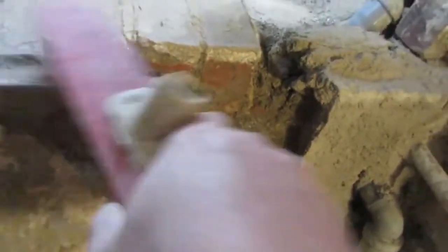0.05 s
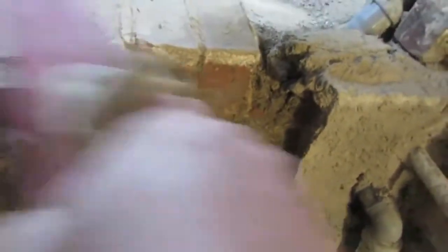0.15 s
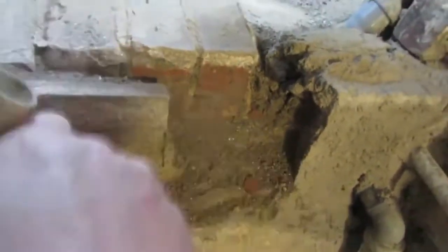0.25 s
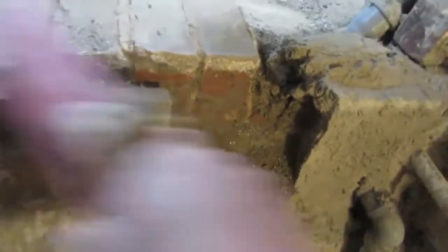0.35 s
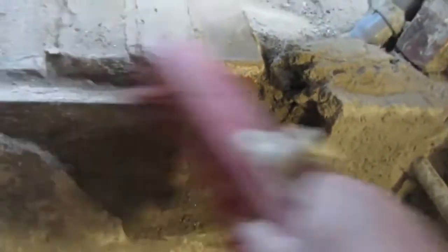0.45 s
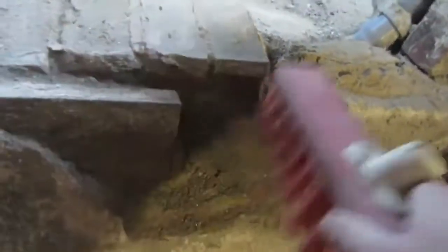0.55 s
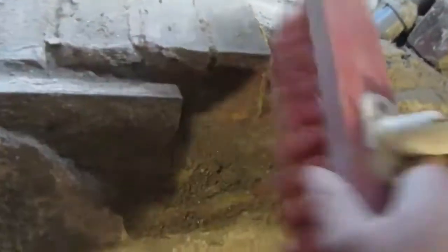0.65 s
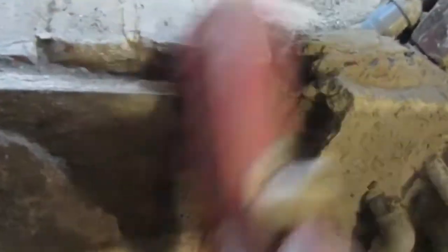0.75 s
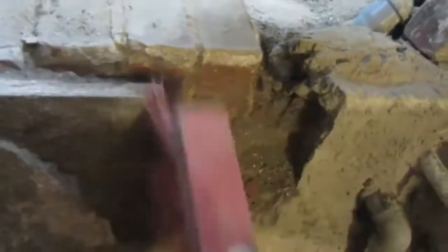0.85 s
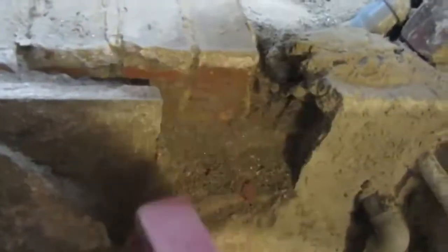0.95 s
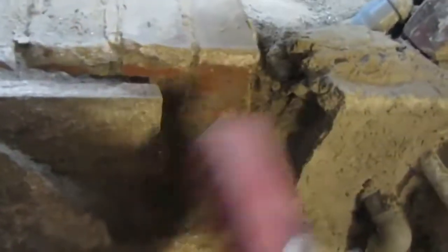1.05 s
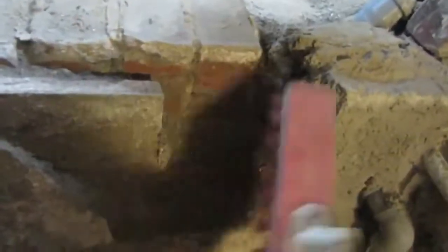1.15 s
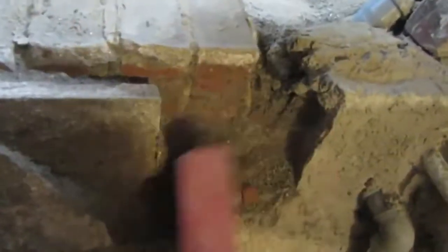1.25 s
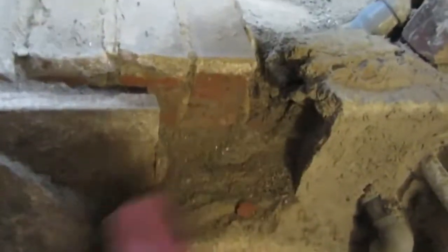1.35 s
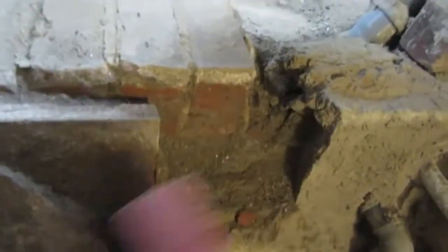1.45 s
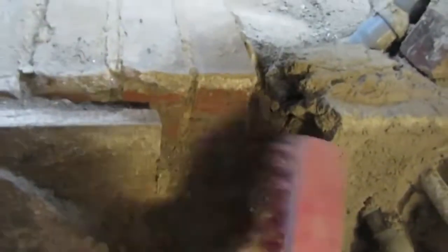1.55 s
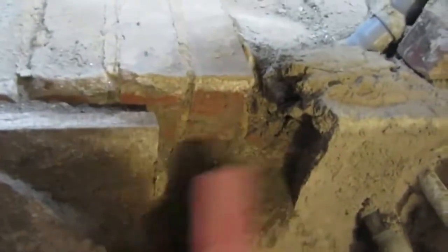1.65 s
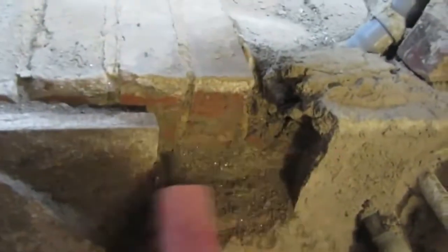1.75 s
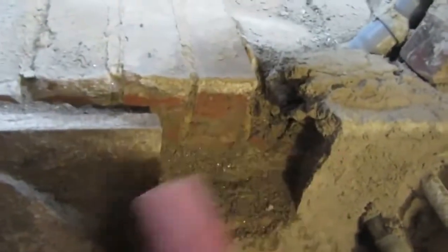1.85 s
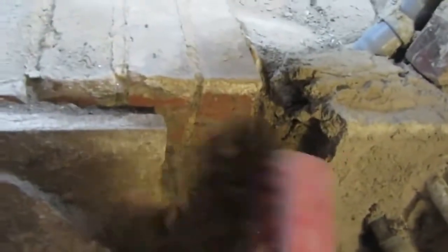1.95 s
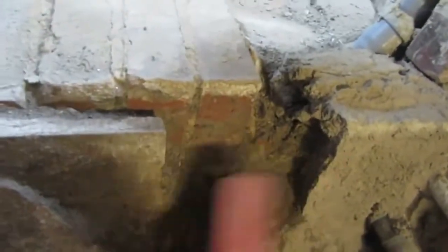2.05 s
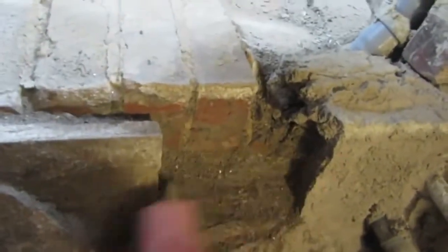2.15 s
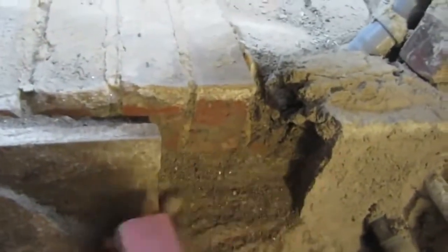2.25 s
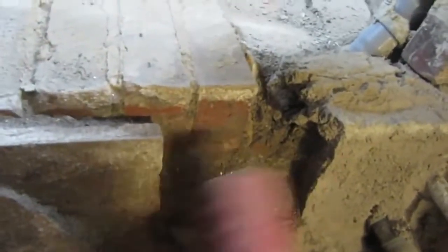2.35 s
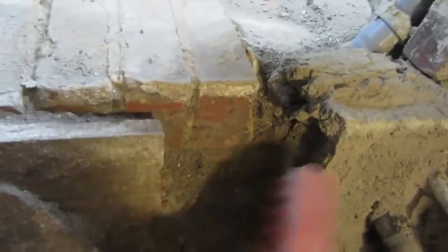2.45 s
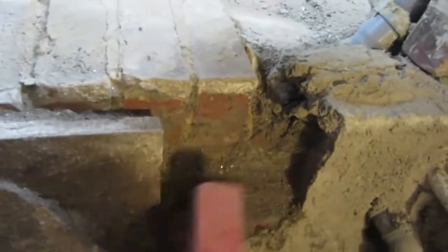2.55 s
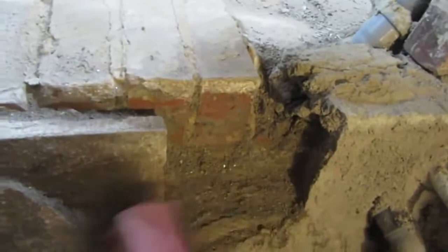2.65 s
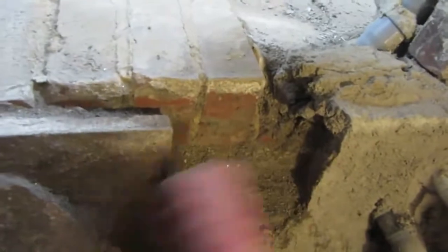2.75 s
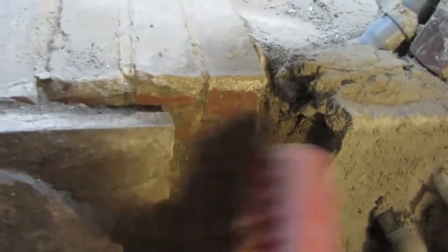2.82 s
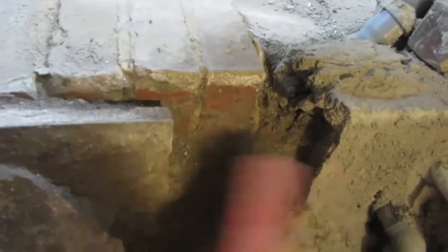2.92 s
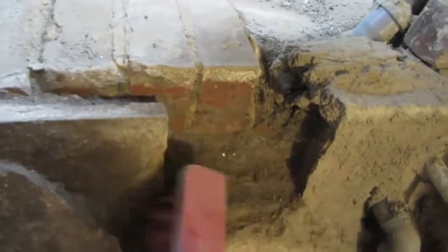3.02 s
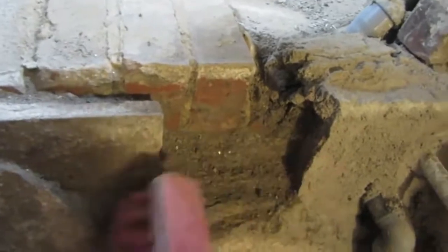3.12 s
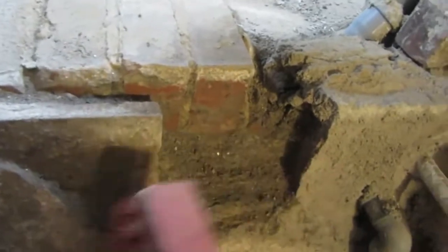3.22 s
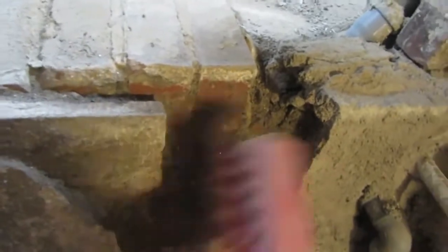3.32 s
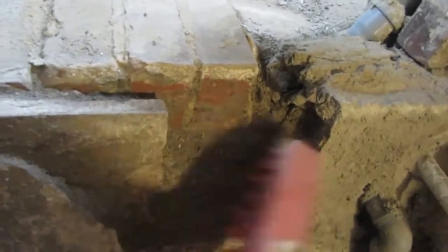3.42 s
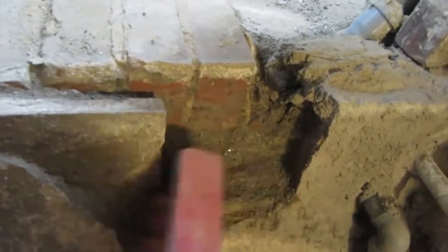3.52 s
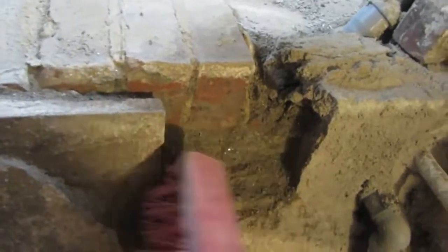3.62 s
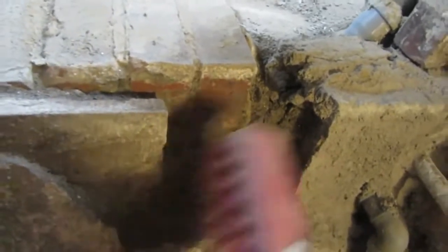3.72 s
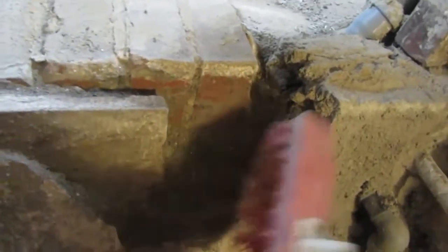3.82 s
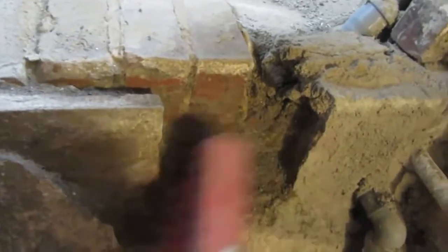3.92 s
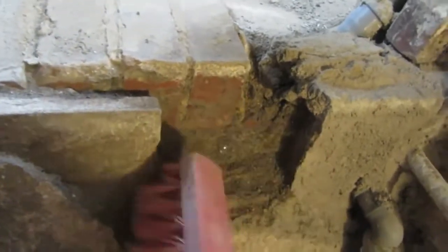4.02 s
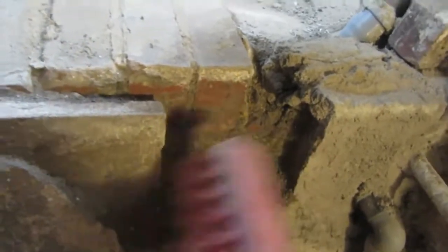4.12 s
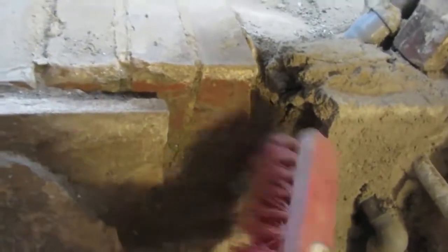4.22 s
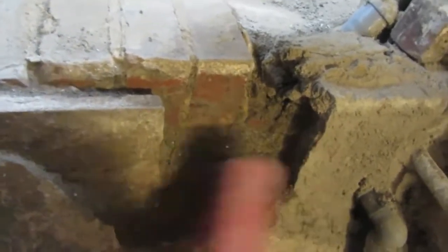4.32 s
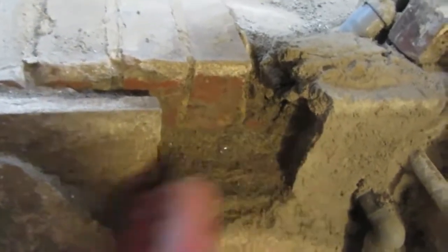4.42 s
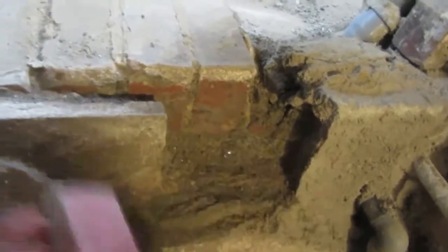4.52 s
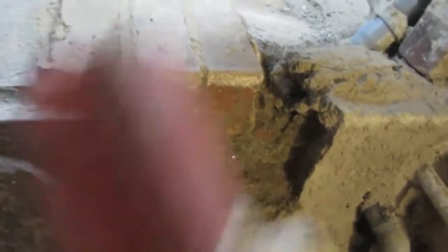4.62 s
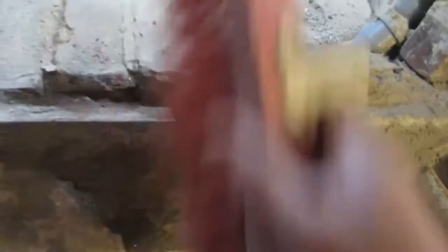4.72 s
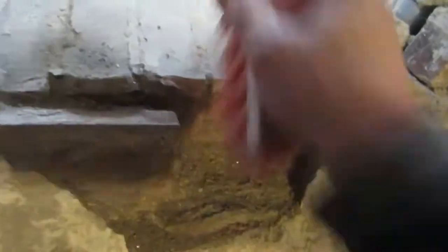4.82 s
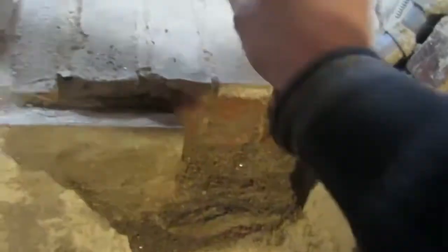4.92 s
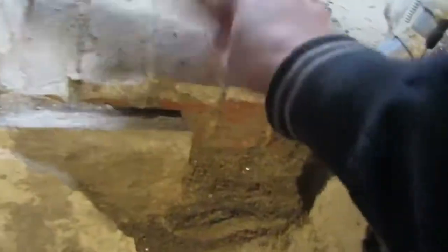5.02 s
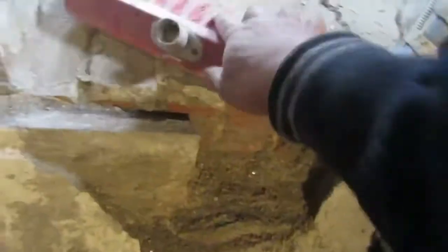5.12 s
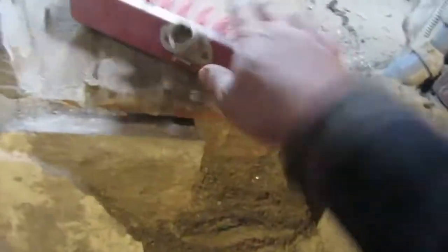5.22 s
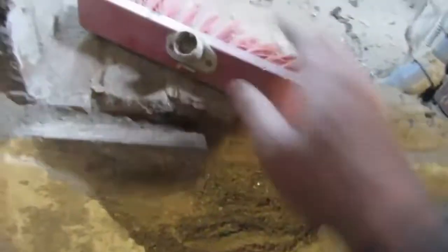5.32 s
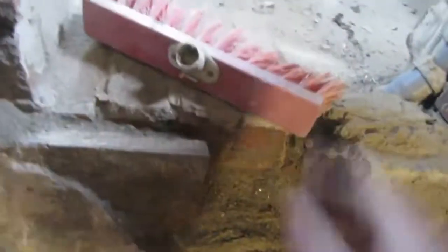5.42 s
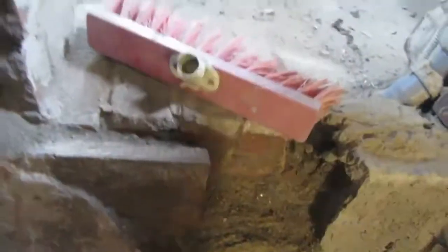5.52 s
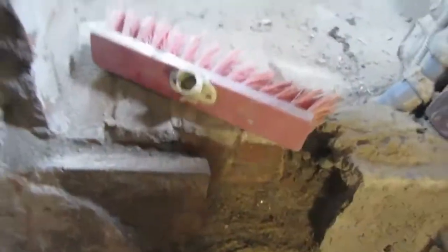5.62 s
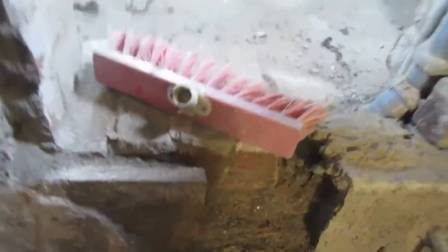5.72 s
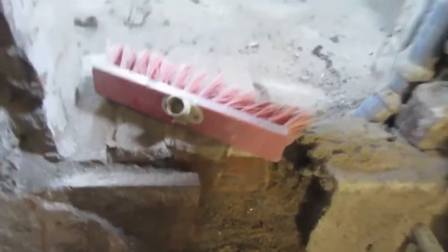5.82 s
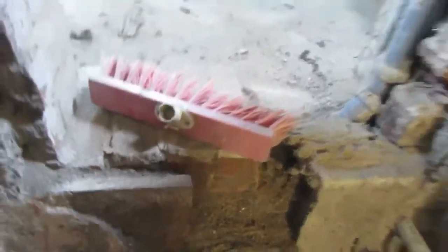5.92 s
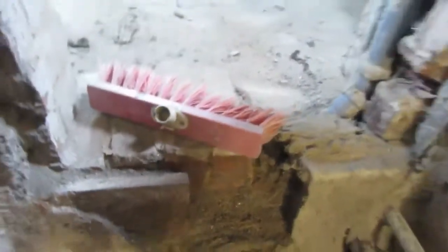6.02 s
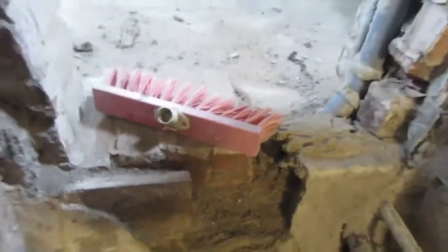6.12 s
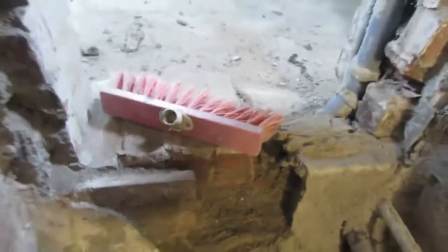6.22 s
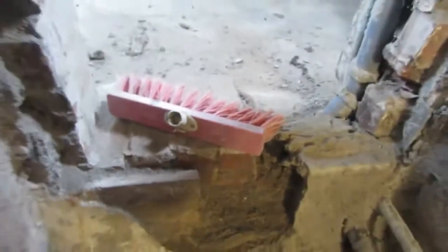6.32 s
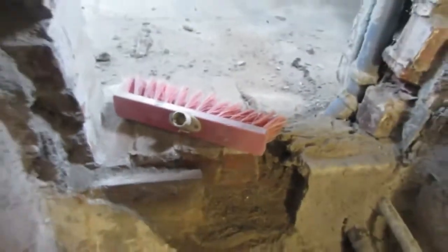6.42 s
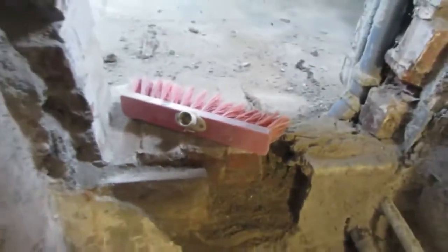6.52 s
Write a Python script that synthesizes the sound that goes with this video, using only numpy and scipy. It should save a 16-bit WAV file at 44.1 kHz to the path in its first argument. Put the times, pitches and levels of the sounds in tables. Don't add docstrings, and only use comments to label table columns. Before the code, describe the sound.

Close mono sound of a stiff bristled brush scrubbing gritty masonry. About a dozen harsh, uneven strokes come roughly twice a second, with the hard block knocking on stone and mortar crumbs ticking down between them. Around five seconds the brush is dropped on a ledge with a loud crack and a couple of fading bounces. Quiet cellar air follows, slowly rising, with a faint sleeve rustle.

```python
import sys
import numpy as np
from scipy import signal
from scipy.fft import rfft, irfft
from scipy.io import wavfile
from scipy.ndimage import uniform_filter1d

SR = 44100
rng = np.random.default_rng(int(sys.argv[2]) if len(sys.argv) > 2 else 0)


def log_audio(samples):
    frames = np.atleast_2d(samples).T
    limited = np.clip(frames, -1, 1)
    pcm = np.round(limited * 32767).astype(np.int16)
    wavfile.write(sys.argv[1], SR, pcm)


def boost_factor(decibels):
    exponent = np.asarray(decibels, float) / 20
    return 10 ** exponent


N = 289736

# f/Hz, level/dB, t60/s
PIT_MODES = [(87, -19, 0.215), (167.5, 3, 0.26), (238, 10.5, 0.065), (320, 11.5, 0.055), (514, -9, 0.173)]


def curve(rows):
    rows = np.array(sorted(rows, key=lambda r: r[0]))
    return [np.interp(np.arange(N) / SR, rows[:, 0], c) for c in rows[:, 1:].T]


def walk(rate):
    k = int(SR / rate)
    held = np.repeat(rng.standard_normal(N // k + 1), k)
    return 1.68 * uniform_filter1d(uniform_filter1d(held, k), k)[:N]


def blend(*levels_db):
    return 10 * np.log10(sum(boost_factor(db) ** 2 for db in levels_db) + 1e-20)


def presses(rows):
    s, rise, hold, lift, db = np.array(rows).T[:, :, None]
    since = np.arange(N) / SR - s
    edge = np.clip(-since / rise, 0, 9) ** 1.31 + np.clip((since - hold) / lift, 0, 9) ** 1.53
    lean_db = -0.1 * (np.clip(since / hold, 0, 1) - .5)
    return db - 28 * edge + lean_db, since


def bandpass(x, low_hz, high_hz):
    return signal.sosfilt(signal.butter(2, [low_hz, high_hz], btype="bandpass", fs=SR, output="sos"), x)


def banded(source, shape, centres, levels_db, patchy_db, rate):
    hz = np.fft.rfftfreq(N, 1 / SR) + 1
    shape_hz, shape_db = np.array(shape).T
    spectrum = rfft(source) * boost_factor(np.interp(np.log(hz), np.log(shape_hz), shape_db))
    spectrum = spectrum / irfft(spectrum, N).std()
    out = 0
    for step in np.arange(15, 43):
        third = np.clip(1 - np.abs(3 * np.log2(hz) - step), 0, 1)
        place = np.interp(step / 3, np.log2(centres), np.arange(len(centres)))
        db = sum(max(1 - abs(place - k), 0) * level for k, level in enumerate(levels_db))
        out = out + boost_factor(db + patchy_db * walk(rate)) * irfft(spectrum * third, N)
    return out


def ring(modes, detune, stretch):
    t = np.arange(SR // 3) / SR
    y = np.zeros(len(t))
    for (hz, db, t60), d in zip(modes, detune):
        y += boost_factor(db) * np.sin(2 * np.pi * hz * d * t) * 1000. ** (-t / (t60 * stretch))
    return y / np.abs(y).max()


def burst(hz, width, t60, tick=0.39, power=1):
    t = np.arange(int(SR * (.02 + t60))) / SR
    low_hz, high_hz = np.clip([hz / width, hz * width], 30, .4 * SR)
    decay = 1000. ** -((t / max(t60, .003)) ** power)
    onset = 1 - np.exp(-(t + 1e-4) / (0.0024 * (power - 1) + 1e-5))
    fade = decay * onset + tick * np.exp(-t / 0.00018)
    y = bandpass(rng.standard_normal(len(t)) * fade, low_hz, high_hz)
    return y / np.abs(y).max()


def add(track, s, sound):
    i = int(s * SR)
    track[i:i + len(sound)] += sound[:N - i]


def steady(low_hz, high_hz):
    noise = bandpass(rng.standard_normal(N), low_hz, high_hz)
    return noise / noise.std()


def cellar():
    # f/Hz, level/dB per Hz
    air_tone = [(12, -45.5), (20, -23), (112, -11), (148, -0.5), (491, -10), (631, -9.5), (788, -12),
                (881, -6), (985, -11), (9130, -30.5), (15500, -41.5)]
    # t/s, level/dB
    gain_ride = [(5.09, -13), (5.2, -2), (5.4, -10), (5.7, -4.5), (6.0, -6), (6.16, -6.5), (6.2, -4),
                 (6.57, -2.5)]
    # t/s, rise/s, hold/s, lift/s, level/dB
    sleeve_moves = [
        (6.35, 0.034, 0.014, .12, -40.5),
        (6.45, .1, 0.0035, .12, -45),
        (6.56, 0.1, .01, .1, -55),
    ]
    # t/s, rise/s, hold/s, lift/s, level/dB
    swells = [(.66, .5, 0.07, 0.28, -59.5), (1.66, .8, 0.068, 0.6, -54.5), (2.3, .8, 0.12, .8, -58),
              (3.07, .7, 0.15, .5, -59), (3.71, .5, 0.33, .9, -61), (4.78, .8, 0.19, .3, -58.5)]
    gain = curve(gain_ride)[0]
    sleeve = blend(*presses(sleeve_moves)[0])
    levels = [gain - 54.5, blend(gain - 51, sleeve - 6.5), blend(gain - 50.5, sleeve)]
    air = banded(rng.standard_normal(N), air_tone, (200, 1400, 7000), levels, 1.0, 4)
    drone_db = blend(*presses(swells)[0], 1.5 * gain - 66)
    deep_db = blend(1.1 * np.minimum.accumulate(gain) - 56.5 + 2.5 * walk(2.4), sleeve - 16)
    drone = steady(78.8, 96) * boost_factor(drone_db)
    deep = steady(22, 37) * boost_factor(deep_db)
    opened = np.clip((np.arange(N) / SR - 6.17) / 0.026, 0, 1)
    pipe = steady(1520, 1800) * boost_factor(-60) * opened
    return air + drone + deep + pipe


def grit():
    # t/s, peak
    # level/dB, centre f/Hz, t60/s
    loose_grit = [(0.209, -33, 2750, 0.043), (0.2525, -21, 6700, 0.017), (0.2914, -39, 3380, 0.026),
                  (0.38, -7, 7200, 0.054), (0.7, -26, 3970, 0.03), (0.719, -27, 2710, 0.054),
                  (0.7578, -19, 5400, 0.047), (0.7893, -20.5, 4630, 0.042), (1.1, -25, 5600, 0.031),
                  (1.106, -24, 2718, 0.029), (1.1455, -13.5, 5430, 0.025), (1.209, -23.5, 2430, 0.14),
                  (1.2425, -12, 2760, 0.028), (1.47, -12.5, 2650, 0.061), (1.492, -30, 3240, 0.042),
                  (1.536, -18, 3250, 0.015), (1.558, 0.5, 4750, 0.017), (1.5986, -17.5, 2740, 0.035),
                  (1.6317, -9, 6260, 0.023), (1.655, -10, 6798, 0.027), (1.6782, -1.5, 4160, 0.027),
                  (1.9816, -11.5, 4400, 0.04), (2.0369, -3, 3380, 0.019), (2.318, -6.5, 6500, 0.017),
                  (2.348, -15, 1615, 0.022), (2.4085, -16, 3480, 0.024), (2.4393, -13, 2710, 0.028),
                  (2.474, 1.5, 4260, 0.014),
                  (2.7924, -5, 3400, 0.0336), (2.832, -11.5, 4200, 0.033), (2.8664, -10.5, 5890, 0.028),
              (2.9098, -7, 3670, 0.041), (3.243, -17, 3030, 0.039), (3.277, -21, 3870, 0.033),
              (3.2887, -13.5, 2230, 0.07), (3.318, -26, 2380, 0.047), (3.3323, -13, 5800, 0.026),
              (3.3546, -24, 7000, 0.015), (3.3838, -16, 2270, 0.028), (3.403, -18, 2310, 0.034),
              (3.438, -17, 2960, 0.028), (3.7395, -15, 6930, 0.011), (3.7608, -10.5, 3670, 0.022),
              (3.8112, -17, 2363, 0.017), (4.153, -21, 2750, 0.029), (4.1947, -13.5, 3070, 0.02),
              (4.252, -6.5, 4790, 0.047), (4.2946, -30, 2453, 0.029),
                  (4.5707, -23.5, 1310, 0.026), (4.592, -19.5, 1640, 0.046), (4.74, -22, 1300, 0.055),
              (4.7233, -15.5, 5330, 0.015), (4.59, -12.5, 5550, 0.094), (4.6203, -9.5, 3680, 0.021),
              (4.6378, -16, 2760, 0.036), (4.6547, -16, 1970, 0.042), (4.6741, -16, 1900, 0.067),
              (4.7119, -10.5, 1830, 0.028), (4.718, -21, 1660, 0.13), (4.8364, -24.5, 2850, 0.087),
              (4.876, -28, 3090, 0.04), (4.888, -20.5, 3060, 0.032), (4.9417, -17.5, 3070, 0.049),
              (4.9601, -20.5, 3060, 0.049), (4.974, -26, 2760, 0.045), (4.906, -26.5, 3500, .025),
              (5.006, -19.5, 3000, 0.029), (5.016, -17.5, 1815, 0.03), (5.024, -20.5, 1513, 0.035),
              (5.031, -16, 5160, 0.065), (5.0789, -24, 2960, 0.03)]
    flicks = [(0.4055, -12, 8100, 0.02), (0.944, -10, 8190, 0.02), (2.394, -29, 7260, 0.018),
              (2.4074, -27, 7090, 0.02), (2.4386, -19, 6300, 0.02), (2.4894, -19, 6610, 0.02),
              (2.7636, -26, 4970, 0.02), (2.848, -20, 4820, 0.022), (2.931, -11, 5760, 0.02),
              (3.2094, -20, 6690, 0.02), (3.277, -24, 7970, 0.02), (3.2874, -33, 7110, 0.02),
              (3.3754, -35, 4550, 0.02), (3.4017, -31, 4890, 0.02), (3.4411, -19, 5600, 0.02),
              (3.4999, -17, 5030, 0.02), (3.6935, -13.5, 5930, 0.02), (3.7164, -24, 7060, 0.02),
              (3.8751, -23, 6260, 0.02), (4.1535, -27, 5180, 0.02), (4.2228, -34, 5220, 0.02),
              (4.2946, -21, 6300, 0.02), (4.578, -20, 6890, 0.022), (4.6244, -27, 5600, 0.02),
              (4.678, -22, 5680, 0.02), (4.7686, -29, 4890, 0.02), (4.835, -26, 4770, 0.02),
              (4.8444, -38, 4920, 0.02), (4.8753, -25, 4800, 0.02), (4.9054, -34, 5720, 0.02),
              (4.9244, -36, 7330, 0.02), (4.9407, -27, 5460, 0.02), (4.9591, -31, 5730, 0.02),
              (4.9731, -25, 4800, 0.02), (4.9974, -30, 4500, 0.02), (5.031, -24, 5270, 0.022),
              (5.2295, -42, 6600, 0.024), (5.2744, -51, 5580, 0.02)]
    specks = [(1.2426, -22, 10900, 0.015), (2.0747, -20, 9850, 0.015), (2.3176, -26, 9350, 0.015),
              (2.3444, -38, 11500, 0.015), (2.7926, -30, 12600, 0.015), (2.832, -17, 9500, 0.015),
              (3.2294, -28, 9560, 0.015), (3.2774, -36, 9720, 0.015), (3.317, -26, 11200, 0.017),
              (3.3827, -38, 11400, 0.015), (3.4017, -33, 9740, 0.015), (4.1799, -42, 9840, 0.015),
              (4.1929, -38, 9840, 0.015), (4.2228, -39, 10900, 0.015), (4.2946, -34, 10700, 0.015),
              (4.585, -22, 12000, 0.015), (4.5904, -27.5, 9770, 0.015), (4.6354, -43, 9740, 0.015),
              (4.7152, -34, 11000, 0.015), (4.7204, -34, 11900, 0.015), (4.7456, -39, 9660, 0.015),
              (4.7905, -40, 10200, 0.015), (4.8155, -40, 11600, 0.015), (4.8424, -30, 10700, 0.015),
              (4.9048, -41, 9520, 0.015), (4.9407, -36, 10100, 0.015), (4.9606, -36, 9540, 0.014),
              (4.9964, -42, 10300, 0.015)]
    # t/s, peak level/dB
    thumps = [(4.781, -43.5), (5.579, -59.5), (5.645, -62.5), (6.065, -51.5), (6.108, -62.5), (6.483, -49)]
    out = np.zeros(N)
    for s, db, hz, t60 in loose_grit:
        add(out, s, boost_factor(db - 6.0) * burst(hz, 1.58, t60, tick=2.7))
    for s, db, hz, t60 in flicks + specks:
        add(out, s, boost_factor(db - 1.5) * burst(hz, 1.35, t60, tick=2.2))
    for s, db in thumps:
        add(out, s, boost_factor(db + 5.5) * ring([(148.0, 4.5, 0.38), (172.3, -12.5, 0.21)], (1, 1), 1.0))
    return out


def shudder():
    # centre f/Hz, level/dB, t60/s
    shudder_bands = [(200, -30.5, 0.44), (320, -18, 0.36), (600, -17, 0.16), (880, -10.5, 0.032),
                     (1402, -18, 0.15), (2120, -21, 0.13), (6050, -33.5, 0.25)]
    # t/s, peak level/dB, shudder level/dB, crack minus peak level/dB, body pitch f/Hz
    bounces = [
        (5.0995, 6.5, 0.5, -7, 1780),
        (5.1645, -22, -11.5, -36, 2600),
        (5.235, -41, -33, -10, 914),
        (5.293, -49, -54, -5, 700),
    ]
    bounce_t60 = 0.0091
    out = np.zeros(N)
    for s, db, shudder_db, crack_db, hz in bounces:
        add(out, s, boost_factor(db) * burst(hz, 1.65, 0.58 * bounce_t60, tick=.6, power=1.6))
        add(out, s, boost_factor(db + crack_db) * burst(7600, 1.1, .3 * bounce_t60, tick=0.32))
        add(out, s + 0.00039, boost_factor(shudder_db - 18.5) * ring(PIT_MODES, (1, 1, 1, 1, 1), 0.43))
        for band_hz, band_db, t60 in shudder_bands:
            add(out, s + 0.0011, boost_factor(shudder_db + band_db) * burst(band_hz, 1.3, t60))
    return out


def knocks():
    # t/s, peak level/dB, thud
    # minus peak level/dB, crack minus peak level/dB, body pitch f/Hz
    block_hits = [(0.316, -17, -26, -10, 1840), (0.404, -13.5, -25, -6, 900), (.79, -28.5, -29, -25.5, 822),
                  (1.243, -25.5, -30, -25, 900), (2.849, -31, -30.5, -25, 960), (0.836, 2, -31, -5, 1947),
                  (1.262, -11, -26, -1, 920), (1.284, -9.5, -30, 1, 830), (1.694, -9, -15, -21, 910),
                  (2.021, -14, -31, -7.5, 875), (2.075, -6.5, -19.5, -1, 1340), (2.335, -18, -14, -25, 763),
                  (2.511, -1, -49, -18.5, 1206), (2.52, -3.5, -22.5, -21.5, 1885),
                  (2.749, -20, -4.5, -17, 910), (2.943, -4.5, -32, -12, 1970),
                  (2.949, -4.5, -21, -19.5, 930), (3.456, -22.5, -20, -7, 900),
                  (3.467, -5.5, -10.5, -4.5, 864), (3.499, -15, -32.5, -6.5, 1048),
                  (3.574, -18, -33.5, -18.5, 1070), (3.764, -17.5, -36.5, -17, 930),
                  (3.89, -6, -24, -4.5, 970), (3.925, -6, -22, -8, 920), (4.318, -2, -17.5, -4, 1088),
                  (6.362, -32, -8.5, -3, 850)]
    # f/Hz, level/dB, t60/s
    block_modes = [(825, -1.5, 0.035), (1381, 0, 0.0085), (1960, -1.5, 0.0116), (2980, 3, 0.038),
                   (4200, -6.5, 0.0205)]
    t60 = 0.016
    out = np.zeros(N)
    for s, db, thud_db, crack_db, hz in block_hits:
        detune = 1 + np.array([[.08], [.04]]) * rng.standard_normal((2, 5))
        add(out, s - .001, boost_factor(db - 6.0) * burst(hz, 1.44, t60, tick=0, power=2.3))
        add(out, s, boost_factor(db - 10.0) * ring(block_modes, detune[0], t60 / 0.029))
        add(out, s, boost_factor(db + crack_db - 4.5) * burst(4700, 1.8, 0.96 * t60, tick=0, power=3.9))
        add(out, s + 0.001, boost_factor(db + thud_db + 4.5) * ring(PIT_MODES, detune[1], 0.89))
    return out


def twangs(drag):
    out, t = np.zeros(N), np.arange(SR // 20) / SR
    for place, pitch, size, length in rng.random((1200, 4)):
        span = .005 * (.5 + length)
        hz = 1500 * (12000 / 1500) ** pitch
        pluck = np.e * t / span * 2 * np.exp(-2 * t / span)
        level = boost_factor(drag[int(place * N)] - 6 - 13 * size)
        add(out, place * N / SR, level * np.sin(2 * np.pi * hz * t) * pluck)
    return out


def bristles():
    # f/Hz, level/dB per Hz
    bristle_tone = [(65, -45.5), (110, -21), (150, -9.5), (301, -6.5), (419, -12), (672, -3.5), (1220, -6),
                    (1350, -2.5), (1960, -3), (2410, 0), (6870, 2.5), (10800, -3), (15000, -14.5)]
    region_hz = [
        300,
        1300,
        4500,
        11500,
    ]
    # full pressure t/s, rise/s, hold/s, lift/s, bristle tips level/dB
    strokes = [(.065, 0.16, 0.05, 0.089, -27.5), (.41, 0.057, 0.17, 0.033, -23),
               (.885, 0.043, 0.032, 0.053, -21.5), (.95, 0.035, 0.048, 0.061, -24),
               (1.275, 0.028, 0.13, 0.11, -24.5), (1.72, 0.1, 0.087, 0.2, -22),
               (2.13, 0.064, .11, 0.12, -19), (2.56, 0.044, 0.13, 0.088, -18.5),
               (2.98, 0.11, 0.14, .13, -18.5), (3.52, 0.055, 0.052, 0.18, -18),
               (3.96, 0.079, 0.084, .12, -20), (4.38, 0.062, .11, 0.033, -18.5)]
    scuffs = [(.321, 0.031, .004, 0.033, -35), (.605, .03, 0.0091, 0.13, -40.5),
              (0.836, 0.0039, .01, 0.023, -21), (1.562, 0.02, .004, 0.028, -35.5),
              (2.069, 0.023, 0.0055, 0.03, -32), (2.517, 0.052, .006, 0.024, -24.5),
              (2.807, 0.056, .004, 0.064, -31.5), (3.773, 0.04, .004, 0.073, -44.5),
              (4.125, 0.092, 0.014, 0.018, -35), (4.26, 0.028, .004, 0.046, -45),
              (4.324, 0.051, .006, 0.05, -32.5), (3.209, .03, .015, 0.022, -32),
              (4.518, 0.033, 0.012, 0.028, -30.5), (5.087, 0.034, .015, 0.059, -27.5)]
    # t/s, level/dB
    dust_fall = [(0, -62), (.24, -55.5), (.75, -55.5), (1.15, -52), (1.53, -49), (2.01, -44), (2.42, -39.5),
                 (2.88, -41), (3.3, -45), (3.45, -42.5), (3.83, -44), (4.22, -47.5), (4.55, -43),
                 (4.72, -44.5), (4.84, -47), (5.04, -48.5), (5.1, -48)]
    # t/s, pitch of the air gap under it f/Hz, gap against body level/dB,
    # body against tips level/dB, finest tips against tips level/dB
    tilt = [(.085, 1840, 2.5, -6.5, -4.5), (.2, 1844, 2, -7, -6.5), (.41, 1840, -6, -4.5, -5.5),
            (.57, 1787, 1.5, -11.5, -6), (.66, 1762, -19, -12.5, -12.5), (.87, 1692, 0, -14, -7.5),
            (1.0, 1950, 1.5, -15, -7), (1.28, 1820, -39, -2.5, -5.5), (1.7, 1880, -33, -1, -9),
            (1.85, 1850, -9, -5.5, -6.5), (2.2, 1720, -12.5, -7, -10), (2.6, 1720, -23, -4, -8),
            (3.1, 1710, -26, -5.5, -9), (3.25, 1573, 3, -7, -6), (3.55, 1790, -16.5, -5, -8.5),
            (4.0, 1800, -21, -3, -6.5), (4.45, 1700, -20.5, -5.5, -6.5), (5.09, 1600, -9, -7, -6)]
    press, since = presses(strokes + scuffs)
    hz, gap_db, body_db, fine_db = curve(tilt)
    dust, drag = curve(dust_fall)[0], blend(*press)
    tips = blend(drag, dust)
    body = blend(drag + body_db, dust + 4)
    landing_db = 6 * np.exp(-np.clip(since, 0, 9) / 0.021)
    boom = blend(*(press - 21.5 + landing_db), dust - 5)
    fine = blend(drag + fine_db, dust - 13)
    busy = np.interp(tips, [-45, -28], [.3, .8])
    slips = (rng.random(N) < busy) * rng.standard_normal(N) / np.sqrt(busy)
    slips = slips * boost_factor(.9 * walk(45) + 1.2 * walk(220) + 1.2 * (1 - busy) * walk(150))
    levels = [boom + 21, body + 9, tips + 0.4, fine + 8]
    scrape = banded(slips, bristle_tone, region_hz, levels, 1.66, 23.99)
    sway = signal.lfilter(*signal.butter(1, 85, fs=SR), slips + 1j * np.roll(slips, N // 3))
    hollow = np.real(sway * np.exp(2j * np.pi * np.cumsum(hz) / SR)) / np.real(sway).std()
    hollow = hollow * boost_factor(blend(drag + body_db, dust) + gap_db + 2.1 * walk(25))
    lifted_db = np.interp(np.arange(N) / SR, [5.097, 5.103, 5.3], [0, -20, -70])
    return (scrape + twangs(drag) + hollow) * boost_factor(lifted_db)


def walls(hits):
    t = np.arange(SR // 2) / SR
    echo = signal.lfilter(*signal.butter(1, 1900, fs=SR), rng.standard_normal(len(t)))
    echo = echo * 1000. ** (-t / 0.16) * (t > .004)
    return signal.fftconvolve(hits, echo / np.linalg.norm(echo))[:N] * boost_factor(-14)


def scene():
    thin = signal.butter(2, 90, btype="highpass", fs=SR, output="sos")
    hits, drop = signal.sosfilt(thin, [knocks() + grit(), shudder()])
    return np.tile(bristles() + hits + walls(hits) + drop + cellar(), (2, 1))


def roll_off(x):
    return signal.sosfilt(signal.butter(12, 16030, fs=SR, output="sos"), x)


def record(dry):
    duck_s = [
        .8225,
        .8245,
        .8315,
        .8335,
    ]
    cut = signal.sosfilt(signal.ellip(9, .5, 45, 15000, fs=SR, output="sos"), dry)
    bass = signal.sosfiltfilt(signal.butter(6, 1200, fs=SR, output="sos"), cut)
    treble = (cut - bass) * np.interp(np.arange(N) / SR, duck_s, [1, 0, 0, 1])
    return roll_off(np.clip(bass + treble, -1, 1))


dry = scene()
out = record(dry)
log_audio(out)
```